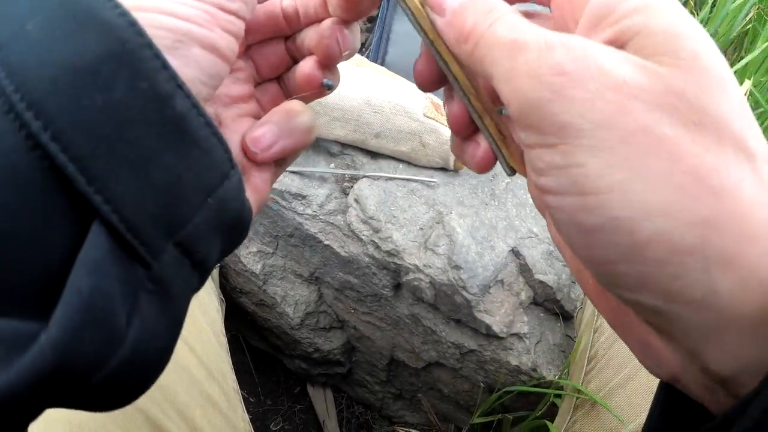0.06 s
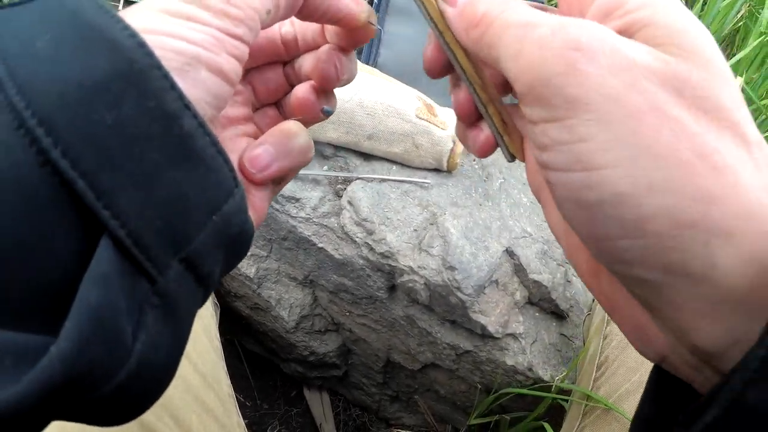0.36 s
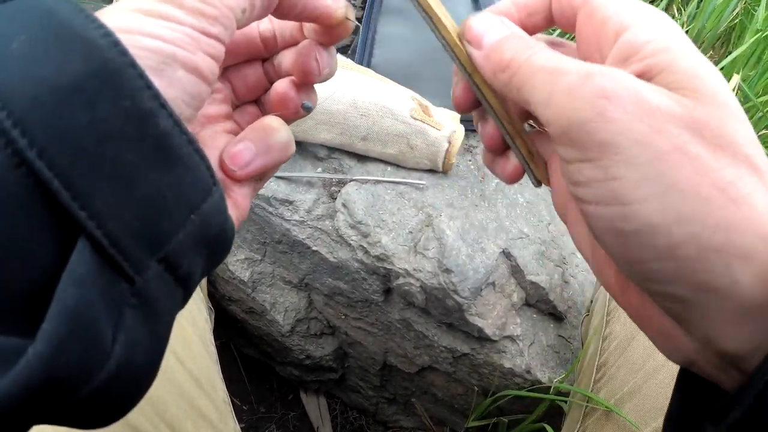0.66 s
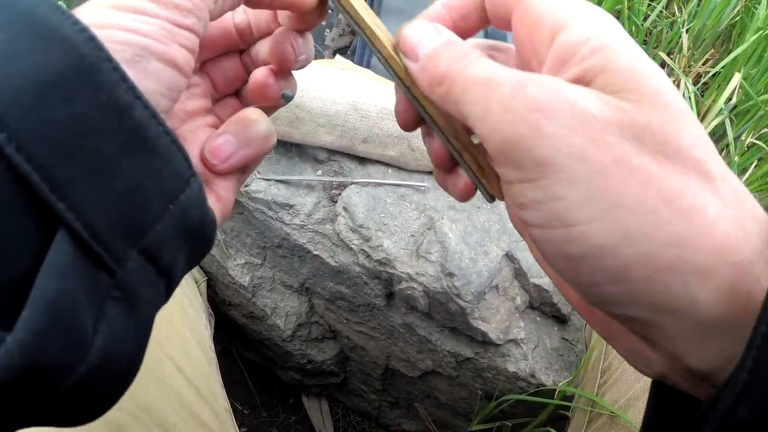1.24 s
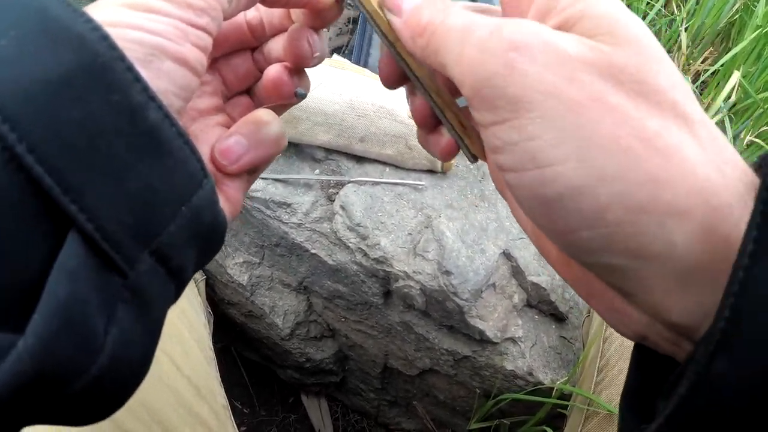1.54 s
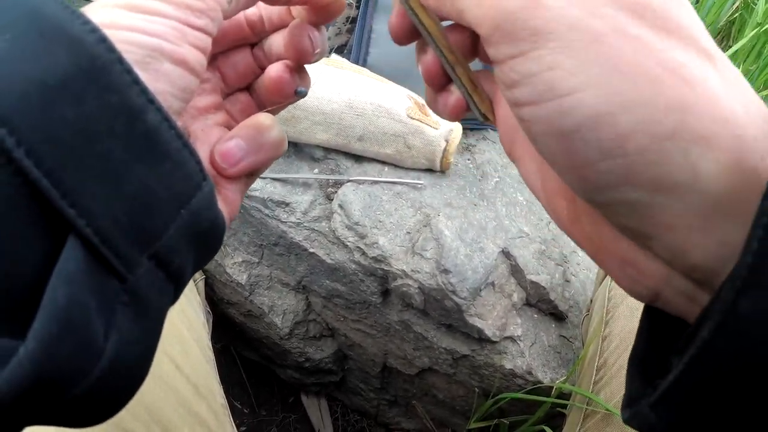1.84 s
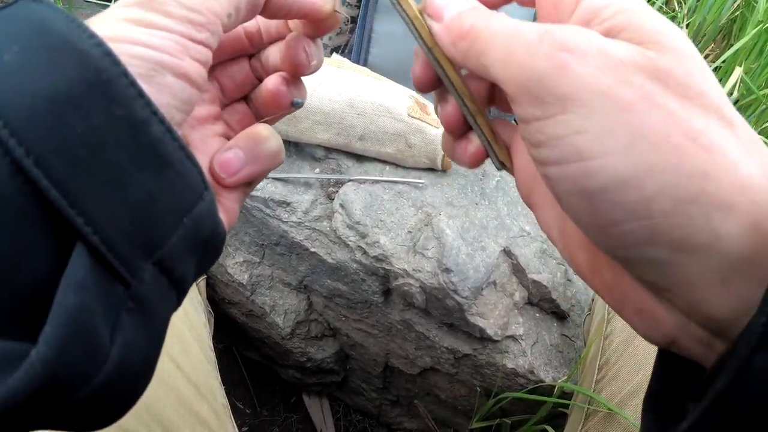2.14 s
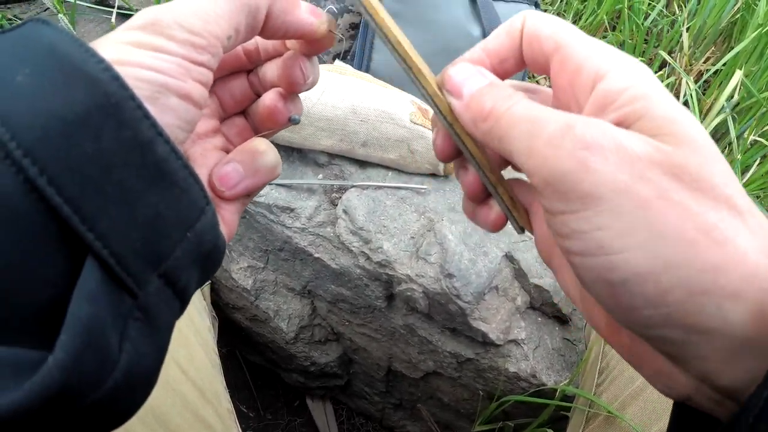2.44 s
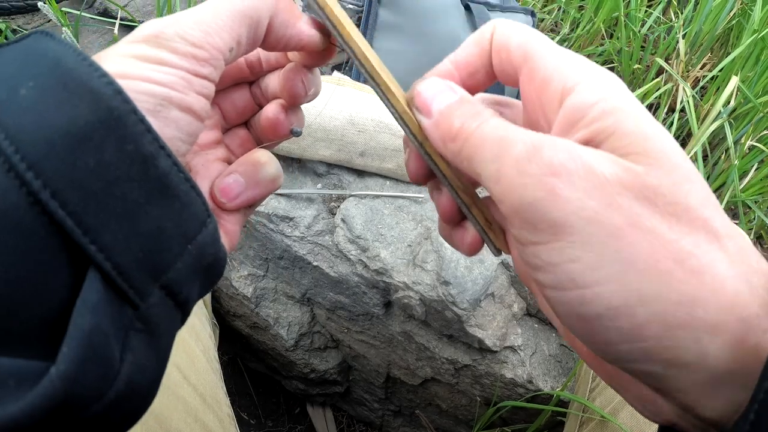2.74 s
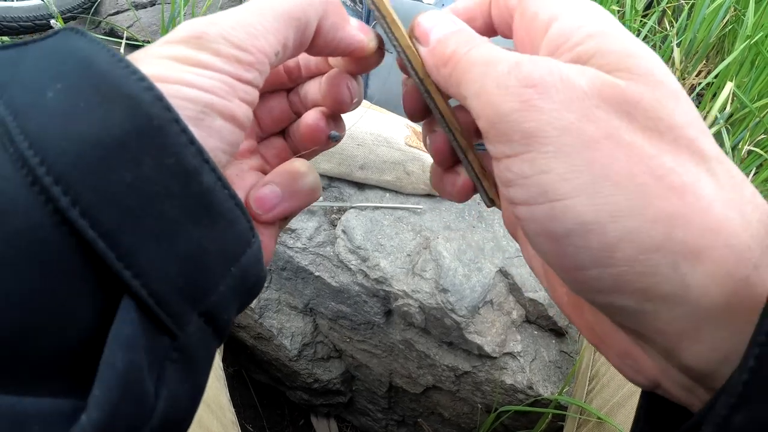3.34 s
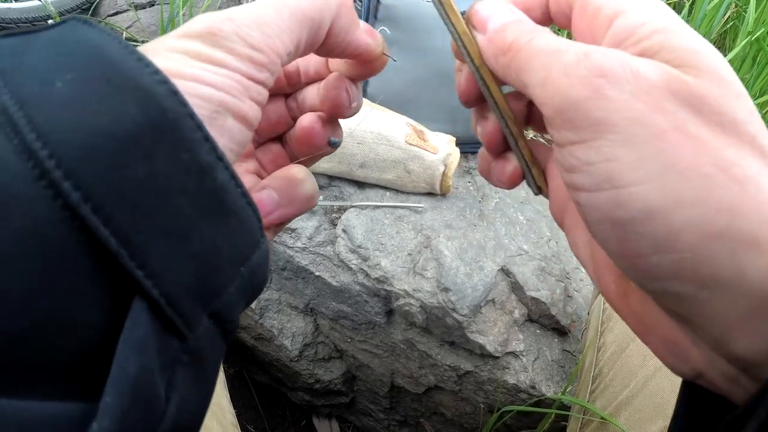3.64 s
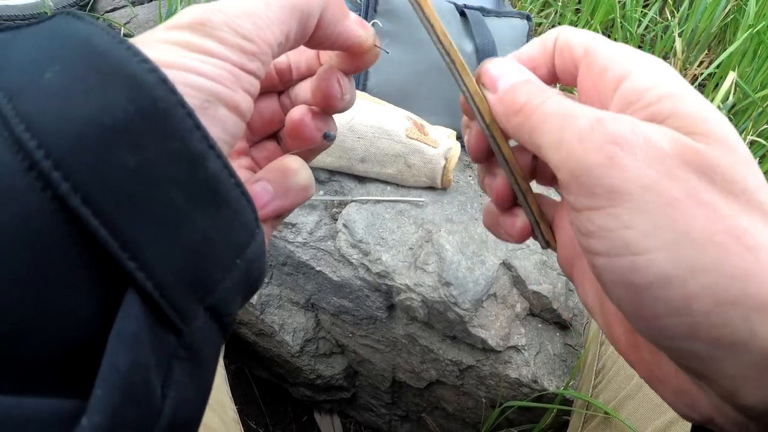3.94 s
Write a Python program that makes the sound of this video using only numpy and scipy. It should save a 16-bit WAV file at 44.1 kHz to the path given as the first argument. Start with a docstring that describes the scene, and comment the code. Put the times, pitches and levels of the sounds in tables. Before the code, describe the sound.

A thin wooden stick slides back and forth close by for four seconds, in soft, dry, uneven scrapes with a thin ring and tiny crackles. It ticks with a soft knock at about 1.5 seconds, then ticks again near 2.9 and 3.3. A jacket sleeve swishes, mostly at the start and after 2.7. Light wind and a distant engine rumble throughout, and a bird chirps faintly around 2.5.

```python
"""Sliding a wooden stick

Outdoors, close to the microphone, a hand slides a thin wooden stick to and fro.
Each stroke is a dry hiss of tiny slips, with a thin ring and a few snapping fibres.
The stick ticks now and then, the hand makes soft knocks, and a jacket sleeve swishes with the arm.
Behind it all are wind rumble, a far engine drone, a far hum and a faint bird."""
import sys
import numpy as np
from scipy import signal
from scipy.fft import rfft, irfft
from scipy.io import wavfile

SR = 44100
rng = np.random.default_rng(int(sys.argv[2]) if len(sys.argv) > 2 else 0)


def generate_wav(sig):
    """Save sig (samples, or channels by samples) to the path in sys.argv[1] as 16-bit PCM at SR."""
    pcm = np.round(np.clip(np.atleast_2d(sig).T, -1, 1) * 32767).astype(np.int16)
    wavfile.write(sys.argv[1], SR, pcm)


N = 176400  # 4 seconds
TIME = np.arange(N) / SR

# A colour says how strong the low and high parts of a sound are.
# Each row of a colour table: frequency in Hz, relative strength in dB.
AIR_COLOUR = [(20, -11.5), (90, 3), (135, -1.5), (210, 3), (320, -0.5), (420, -2.5), (520, -10.5),
              (750, -10), (1100, -19), (1700, -25), (2700, -32), (4500, -35.5), (6500, -35.5),
              (9300, -34.5), (12000, -41), (16000, -43)]  # the soft wash of open air
WIND_COLOUR = [(5, 8), (14, 2), (30, -2.5), (55, -5), (85, -6), (130, -30.5), (400, -45), (2000, -68)]  # deep wind rumble
RUSTLE_COLOUR = [(150, -11), (450, 8.5), (800, -1.5), (1150, -4), (1800, -8), (2500, -4), (3100, -10.5),
                 (4200, -8.5), (5200, -13), (7000, -14), (11000, -15), (16000, -37)]  # the sleeve's broad rustle
HOLLOW_COLOUR = [(200, -13), (700, -7.5), (1150, -8), (1550, -5), (1880, -0.5), (2200, -12), (2600, -14),
                 (3300, -19), (5000, -32), (16000, -45)]  # the sleeve's hollow swish
KNOCK_COLOUR = [(300, -26), (1500, -4), (2400, -2), (3300, -4.5), (7000, 2), (11000, -10), (12500, -15),
                (16000, -24)]  # the dry knock in a tick
HISS_COLOUR = [(200, -34), (700, 1), (1300, -2.5), (2200, -5.5), (3300, -9), (4400, -5), (5600, -4.5),
               (7400, -0.5), (8800, 2), (10000, -2.5), (11200, -7), (12600, -13.5), (14200, -21),
               (16000, -25)]  # sliding wood
RING_COLOUR = [(200, -61), (4300, -18.5), (6300, -18), (8000, -16), (8900, -5), (9550, -2.5), (10200, -9),
               (11200, -15), (12500, -25), (16000, -28)]  # the stick's thin ring as it slides
CRACKLE_COLOUR = [(200, -30), (4000, -9), (8000, -10), (10700, 9), (12300, 2), (14000, 3), (16000, -5)]  # snapping fibres

# The far engine's tones. Each row: pitch in Hz, pitch wander in Hz, start level in dB, end level in dB.
ENGINE_TONES = [(39.6, 1.8, -36, -40.5), (60.27, 1.56, -46, -39), (73.86, 2.45, -42.5, -53)]
# Swells of the far hum. Each row: peak time, rise and fall in seconds, level in dB.
HUM_SWELLS = [(1.71, 0.046, .1, -45), (3.19, 0.1, 0.035, -41)]
# The bird's chirps. Each row: start and length in seconds, first and last pitch in Hz, level in dB.
BIRD_CHIRPS = [(2.136, .011, 5800, 4700, -57), (2.537, .022, 5200, 4100, -58),
               (2.585, .06, 5350, 4900, -61)]
# Dull knocks. Each row: peak time in seconds, pitch in Hz, half length in seconds, peak level in dB. # Most
# come from the hand; the row at 1.4708 s gives the stick's tick there a low body.
DULL_KNOCKS = [(1.4336, 296, 0.0042, -27.5), (1.439, 320, 0.011, -45), (1.4708, 1500, .0005, -37.5),
               (2.156, 730, 0.0014, -38.5), (3.298, 27, 0.027, -27), (3.596, 61.5, 0.011, -34),
               (3.775, 472, 0.028, -43.5)]
# Swishes of the sleeve. Each row: peak time, rise and fall in seconds, hollow and rustle levels in dB.
SLEEVE_SWISHES = [ (.015, .04, 0.07, -48.5, -44.5), (.11, 0.037, 0.037, -45, -51.5),
                  (.28, 0.082, 0.076, -47.5, -46.5), (.40, 0.052, 0.027, -51.5, -43),
                  (.46, 0.051, 0.036, -44, -48), (.83, 0.053, 0.027, -67, -61),
                  (1.124, 0.016, 0.0098, -64, -45.5), (1.2, 0.02, 0.02, -62, -62),
                  (1.48, 0.059, 0.12, -62, -58), (2.32, 0.088, 0.029, -59, -53),
                  (2.705, 0.043, 0.025, -50.5, -53), (2.815, 0.048, 0.059, -56, -54),
                  (3.005, 0.06, 0.033, -46.5, -53.5), (3.15, 0.04, 0.061, -51.5, -56.5),
                  (3.40, 0.082, .036, -45.5, -46), (3.51, 0.048, 0.081, -61, -57),
                  (3.782, 0.057, 0.039, -43.5, -42), (3.93, 0.036, 0.052, -54.5, -55)]
# Ticks of the stick. Each row: start in seconds, level in dB, share of the duller knock from 0 to 1.
STICK_TICKS = [(1.4558, -26.5, .45), (1.4702, -27.5, 0.54), (2.9117, -34, 1), (2.9167, -24, 0.7),
               (3.3128, -20, 0), (3.3176, -28, .05), (3.336, -24, 0.2)]
# The tones ringing in a tick. Each row: pitch in Hz, relative level in dB, seconds to fade by 60 dB.
TICK_TONES = [(5900, -10, 0.0041), (8800, -0.5, 0.0034), (9550, 1, .003), (13400, -11, 0.0022)]
# Single fibres snapping. Each row: start in seconds, peak level in dB.
FIBRE_SNAPS = [(0.795, -37), (1.5312, -42), (1.5383, -32), (1.5584, -33), (1.5632, -32), (1.92, -32),
               (1.9348, -35), (2.241, -37), (2.29, -35), (2.316, -31), (2.33, -36), (2.6174, -33)]
# Strokes of the stick. Each row: peak time, rise and fall in seconds, hiss, ring and crackle levels in dB.
STICK_STROKES = [ (.065, 0.047, 0.053, -51, -65, -64), (.25, 0.082, .07, -58.5, -68, -76),
                 (.455, 0.059, 0.039, -50.5, -55, -68), (.765, 0.022, 0.015, -49.5, -56, -68),
                 (.83, 0.03, 0.032, -51.5, -53.5, -54.5), (.965, 0.031, 0.057, -54.5, -63, -68),
                 (1.11, .06, 0.041, -50.5, -59, -68), (1.19, 0.024, 0.033, -48, -55, -54),
                 (1.29, .02, 0.097, -72, -66, -78), (1.465, 0.05, 0.045, -56, -59, -72),
                 (1.55, 0.046, 0.033, -55, -55, -56), (1.66, 0.11, 0.14, -64.5, -63, -82),
                 (1.925, 0.024, 0.034, -51, -55, -53), (1.88, 0.045, .04, -56.5, -55, -66),
                 (2.09, 0.041, .03, -68, -60, -72), (2.245, 0.021, .02, -61, -55, -59),
                 (2.305, 0.043, 0.047, -44, -56, -56), (2.62, 0.084, .02, -57, -76, -69),
                 (2.675, 0.034, 0.051, -48, -51, -56), (2.851, 0.048, 0.028, -50, -59, -56),
                 (2.98, .04, 0.043, -57, -58.5, -68), (3.17, 0.034, 0.072, -67, -65.5, -78),
                 (3.29, 0.03, 0.011, -53, -71, -74), (3.385, 0.054, 0.031, -55.5, -47, -61),
                 (3.50, 0.041, 0.073, -49, -63, -66), (3.68, 0.066, 0.035, -48.5, -63, -68),
                 (3.755, 0.032, .04, -51, -46, -56), (4.0, 0.035, .04, -57.5, -66, -74)]


def amp(db):
    """Turns decibels into a number to multiply by."""
    return 10 ** (np.asarray(db) / 20)


def unit(x):
    """Scales a signal to an average (rms) level of 1."""
    return x / np.sqrt(np.mean(x ** 2) + 1e-20)


def add(mix, start, sound):
    """Mixes a sound in at a start time in seconds."""
    part = mix[max(round(start * SR), 0):][:len(sound)]
    part += sound[:len(part)]


def colour(x, points):
    """Shapes a signal's lows and highs with a colour table, at an average level of 1."""
    hz, db = np.transpose(points)
    freqs = np.fft.rfftfreq(len(x), 1 / SR)
    gain = amp(np.interp(np.log(freqs + 1), np.log(hz + 1), db))
    return unit(irfft(rfft(x) * gain, len(x)))


def drift(rate_hz):
    """A smooth random wander, about 1 in size; a higher rate wanders faster."""
    freqs = np.fft.rfftfreq(N, 1 / SR)
    smoothing = np.exp(-(freqs / rate_hz) ** 2) * (freqs > 0)
    return unit(irfft(rfft(rng.standard_normal(N)) * smoothing, N))


def slips(per_second, spread_db):
    """Rubbing surfaces catch and slip, making tiny random clicks of uneven size."""
    size = amp(spread_db * np.minimum(rng.exponential(1, N), 4))
    return size * rng.choice([-1, 1], N) * (rng.random(N) < per_second / SR)


def swells(peaks, rises, falls, levels_db, steepness):
    """The level of overlapping swells that rise and fall; steepness 2 gives a bell shape."""
    power = np.zeros(N)
    for peak, rise, fall, db in zip(peaks, rises, falls, levels_db):
        away = abs(TIME - peak) / np.where(TIME < peak, rise, fall)
        power += amp(db) ** 2 * np.exp(-away ** steepness)
    return np.sqrt(power)


def fading_noise(fade_s):
    """A short puff of noise that drops by 60 dB in fade_s seconds."""
    t = TIME[:2048]
    return rng.standard_normal(len(t)) * np.exp(-np.log(1000) * t / fade_s)


def burst(points, fade_s):
    """A tiny noisy snap of a given colour, with a peak of 1."""
    snap = np.roll(colour(fading_noise(fade_s), points), 8)  # a tiny delay keeps its onset whole
    return snap / abs(snap).max()


def air_and_wind():
    """A steady far wash, and light wind buffeting the microphone."""
    air = amp(-40 + 0.55 * drift(rate_hz=7.9)) * colour(rng.standard_normal(N), AIR_COLOUR)
    wind = amp(-38.5 + 1.7 * drift(rate_hz=1.9)) * colour(rng.standard_normal(N), WIND_COLOUR)
    return air + wind


def far_engine():
    """A far engine drones: low tones that waver in pitch and level."""
    out = np.zeros(N)
    for hz, wander_hz, start_db, end_db in ENGINE_TONES:
        cycles = np.cumsum(hz + wander_hz * drift(rate_hz=3.23)) / SR + rng.random()
        tone = amp(2.7 * drift(rate_hz=3.1)) * np.sin(2 * np.pi * cycles)
        out += amp(np.linspace(start_db, end_db, N)) * unit(tone)
    return out


def far_hum(pitch_hz=196.6, wander_hz=2.8):
    """A far hum swells twice."""
    cycles = np.cumsum(pitch_hz + wander_hz * drift(rate_hz=9.8)) / SR
    return swells(*np.transpose(HUM_SWELLS), steepness=2.5) * unit(np.sin(2 * np.pi * cycles))


def bird(waver_hz=130):
    """A far bird gives faint falling chirps with an unsteady pitch."""
    out = np.zeros(N)
    for start, length, from_hz, to_hz, db in BIRD_CHIRPS:
        progress = np.linspace(0, 1, round(length * SR))
        glide_hz = from_hz + (to_hz - from_hz) * progress
        cycles = np.cumsum(glide_hz + waver_hz * drift(rate_hz=270)[:len(progress)]) / SR
        add(out, start, amp(db) * np.sin(np.pi * progress) * np.sin(2 * np.pi * cycles))
    return out


def dull_knocks():
    """The hand makes dull knocks, each only a few vibrations long; one more gives a tick of the stick its low
    body."""
    out = np.zeros(N)
    for peak, hz, half_length, db in DULL_KNOCKS:
        t = TIME - peak
        out -= amp(db) * np.exp(-(t / half_length) ** 2) * np.cos(2 * np.pi * hz * t)
    return out


def sleeve(threads_per_second=6000, steepness=2.45):
    """Cloth drags over cloth: a hollow swish and a broad rustle."""
    peak, rise, fall, hollow_db, rustle_db = np.transpose(SLEEVE_SWISHES)
    hollow = colour(slips(threads_per_second, spread_db=2.5), HOLLOW_COLOUR)
    rustle = colour(slips(threads_per_second, spread_db=1.0), RUSTLE_COLOUR)
    hollow *= swells(peak, rise, fall, hollow_db, steepness)
    rustle *= swells(peak, rise, fall, rustle_db, steepness)
    flutter = amp(1.25 * drift(rate_hz=35))
    return flutter * (hollow + rustle)


def stick_ticks(rise_s=0.00015, tail_db=-11):
    """The stick catches and lets go: a very short ring, a dry knock and a small noisy tail."""
    out, t = np.zeros(N), TIME[:2048]
    ring = sum(amp(db - 60 * t / fade_s) * np.sin(2 * np.pi * hz * t) for hz, db, fade_s in TICK_TONES)
    ring *= 1 - np.exp(-t / rise_s)
    ring /= abs(ring).max()
    for start, db, knock_share in STICK_TICKS:
        tick = (1 - knock_share) * ring + knock_share * burst(KNOCK_COLOUR, fade_s=0.003)
        tail = signal.fftconvolve(fading_noise(fade_s=0.018), tick)[:len(t)]
        add(out, start, amp(db) * (tick / abs(tick).max() + amp(tail_db) * tail / abs(tail).max()))
    return out


def sliding_stick(steepness=2.86, crackle_lead_s=0.0098):
    """Slips along the wood make a hiss, a thin ring and a crackle of fibres, with a few louder snaps."""
    peak, rise, fall, hiss_db, ring_db, crackle_db = np.transpose(STICK_STROKES)
    grip = amp(drift(rate_hz=32))  # an uneven grip moves the level by about 1 dB
    hiss = colour(slips(per_second=9000, spread_db=2.5), HISS_COLOUR)
    ring = colour(slips(per_second=1500, spread_db=3.5), RING_COLOUR)
    crackle = colour(slips(per_second=1100, spread_db=3.5), CRACKLE_COLOUR)
    hiss *= swells(peak, rise, fall, hiss_db, steepness)
    ring *= swells(peak, rise, fall, ring_db, steepness)
    # The fibres catch before the slide reaches full speed.
    crackle *= swells(peak - crackle_lead_s, rise, fall, crackle_db, steepness)
    out = grip * (hiss + ring + crackle)
    for start, db in FIBRE_SNAPS:
        add(out, start, amp(db) * burst(CRACKLE_COLOUR, fade_s=0.0033))
    return out


def scene():
    """Near and far sounds meet at one microphone."""
    near = sliding_stick() + sleeve() + stick_ticks() + dull_knocks()
    background = bird() + far_engine() + far_hum() + air_and_wind()
    return (near + background)[None]


def record(dry, cutoff_hz=15850):
    """The recorder cuts off the very highest treble."""
    low_pass = signal.firwin(511, cutoff_hz, window=("kaiser", 9), fs=SR)
    return signal.oaconvolve(dry, low_pass[None], "same")


dry = scene()
out = record(dry)
generate_wav(out)
```